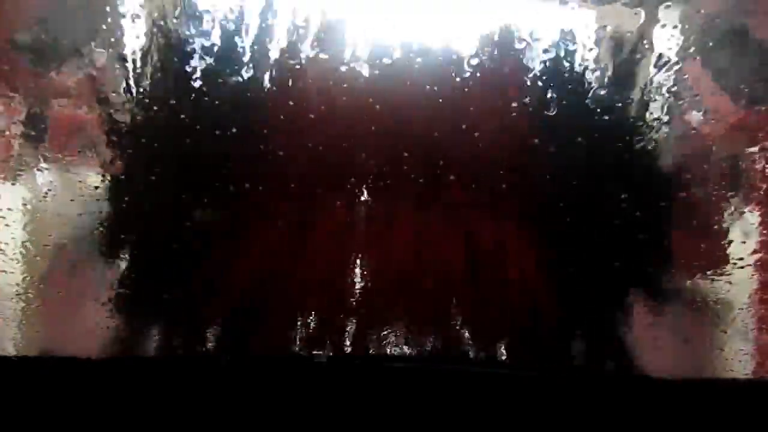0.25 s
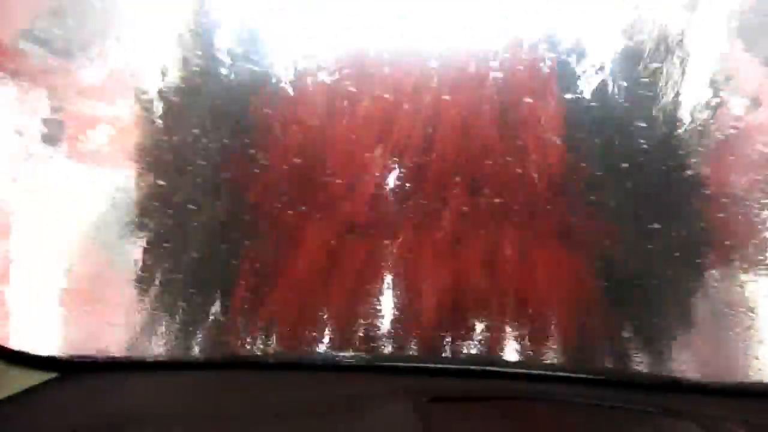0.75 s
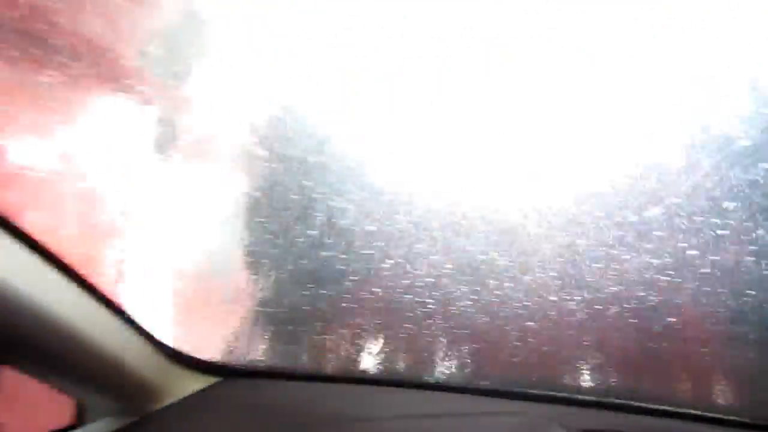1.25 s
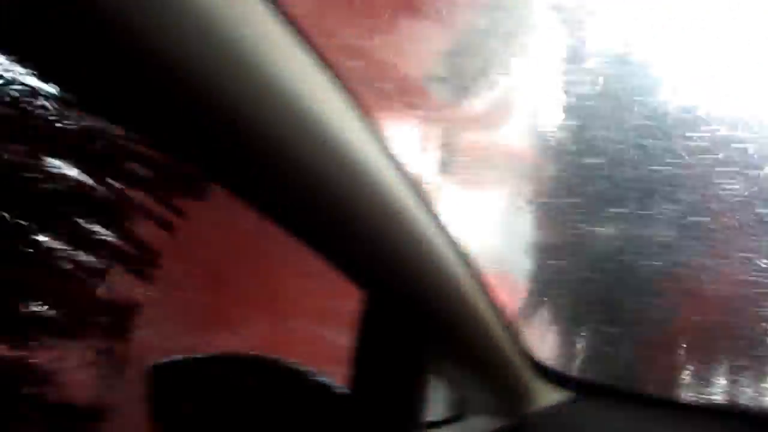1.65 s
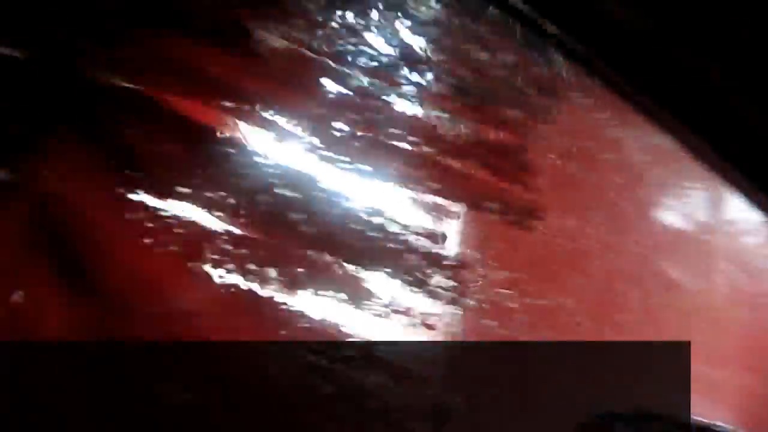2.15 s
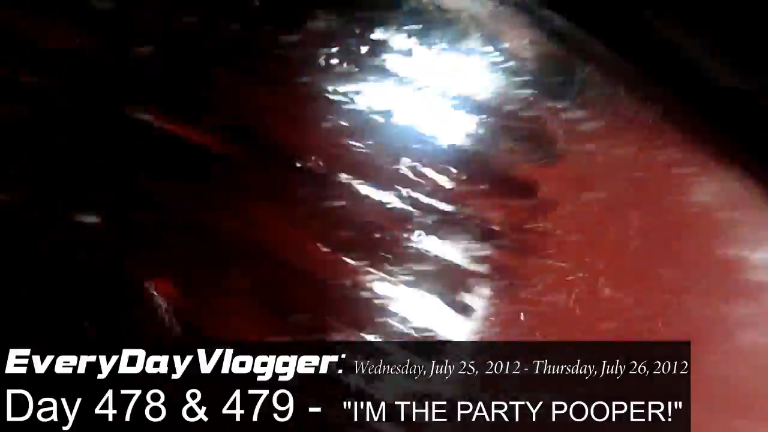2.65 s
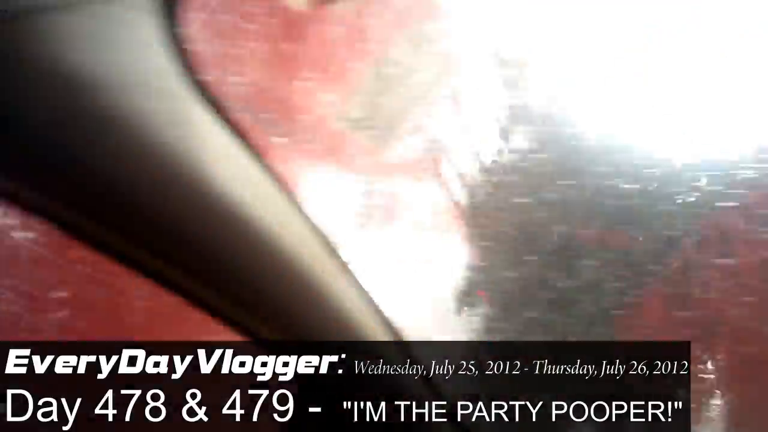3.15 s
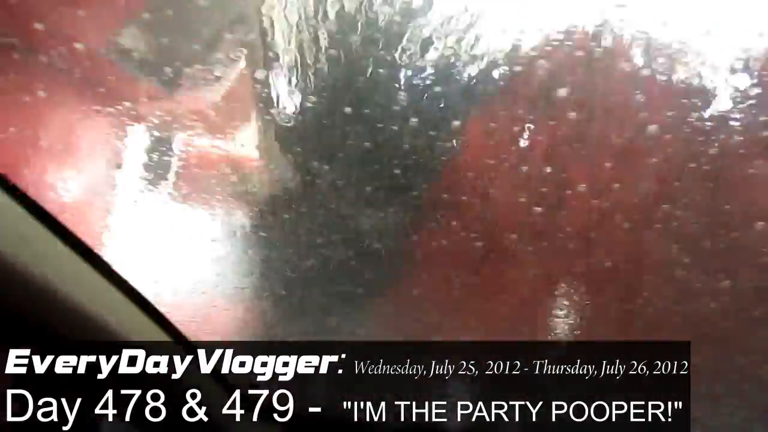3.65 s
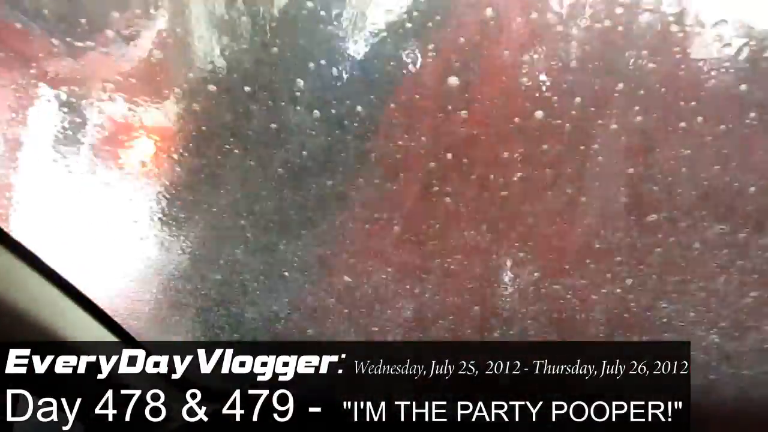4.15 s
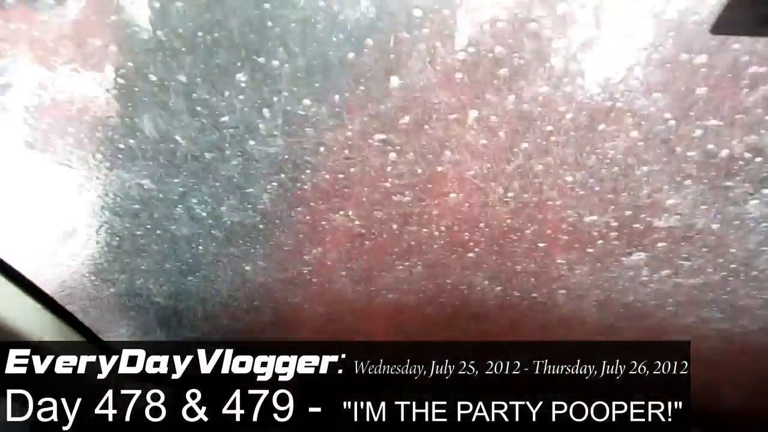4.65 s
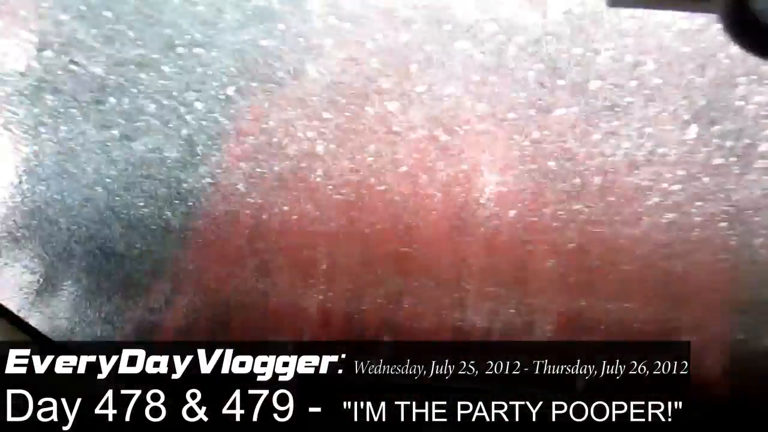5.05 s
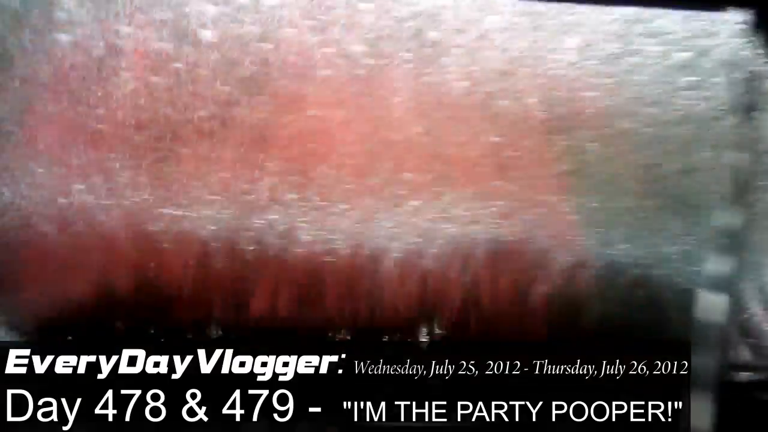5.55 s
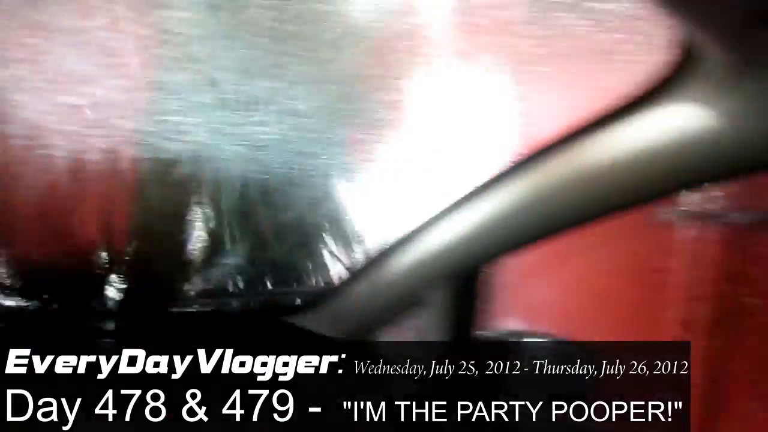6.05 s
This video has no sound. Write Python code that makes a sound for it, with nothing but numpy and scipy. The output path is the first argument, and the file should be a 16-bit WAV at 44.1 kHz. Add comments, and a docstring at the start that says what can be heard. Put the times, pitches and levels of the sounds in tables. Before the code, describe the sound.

Inside a closed car in an automatic wash, soaked cloth brushes drum and boom on the bodywork while water hisses and patters on the glass.

```python
"""The cabin booms at once as spinning cloth flogs the car: dense random blows, coloured by panel, glass and
air. Flung water hisses and patters on the glass (still denser blows, short rings); low noise rumbles below it.
Early on the body shudders (a slow sine in bouts), and doors thump (sinking tones). Slaps, flicks, drops and
bursting blobs (noise and rings with quick fades) land on the body and the glass, heard inside a closed car in
an automatic wash; towards the end the top brush nears the windscreen and the water grows brighter."""
import sys
import numpy as np
from scipy import signal
from scipy.fft import rfft, irfft, next_fast_len
from scipy.io import wavfile
from scipy.ndimage import uniform_filter1d, map_coordinates

SR = 44100
rng = np.random.default_rng(int(sys.argv[2]) if len(sys.argv) > 2 else 0)


def store_wav(level_fs):
    """Save 16-bit WAV to argv[1]."""
    pcm = np.round(np.clip(np.atleast_2d(level_fs), -1, 1) * 32767)
    wavfile.write(sys.argv[1], SR, pcm.T.astype(np.int16))


N = 278271
TIME = np.arange(N) / SR
PADDED = next_fast_len(N + SR // 2, real=True)
BINS = np.arange(PADDED // 2 + 1) * SR / PADDED   # Hz
LULL_DB = -1.5   # floor of the surges that drive the water between bunches of strips

# how near the top brush is to the windscreen: time_s, nearness (0 far - 1 touching)
NEARNESS = [(0.04, 0.15), (1.9, 0.016), (3.3, 0.078), (4.7, 0.24), (5.7, 0.31), (6.0, 0.47), (6.31, 1)]
# colour of splashing water: freq_hz, gain_db
SPLASH_COLOUR = [(900, -2.5), (1800, -2), (3000, 9), (4500, 9), (6000, 2.5), (8000, -7), (10000, -20),
                 (12000, -39.5)]
# side brushes thump a door panel: start_s, level_db, pitch_hz (at the start)
DOOR_THUMPS = [(0.248, -26, 159), (0.406, -15.5, 150), (0.736, -19, 148.6), (1, -23.5, 149),
               (1.257, -21, 154), (1.52, -22, 150.7), (1.653, -18, 150.6), (1.712, -17, 148),
               (1.819, -15, 132.4), (1.876, -18, 128), (1.933, -19, 147), (2.045, -13.5, 149),
               (2.168, -20, 157), (2.299, -13.5, 147.5), (2.369, -18.5, 135), (2.498, -17, 163),
               (2.593, -17.5, 135), (2.788, -10.5, 179.4), (2.881, -14, 144), (2.967, -14.5, 160),
               (3.048, -19, 136), (3.127, -14.5, 141.4), (3.209, -17, 133.3), (3.267, -23.5, 143),
               (3.512, -12.5, 127), (3.621, -15, 135.4), (3.741, -18.5, 136), (3.868, -18.5, 149),
               (3.932, -18, 127), (4.006, -14, 131.4), (4.075, -19.5, 143), (4.245, -17, 133.6),
               (4.346, -25.5, 141), (4.434, -11, 138.4), (4.532, -14.5, 125), (4.672, -14, 125),
               (4.809, -16, 141), (5.147, -13, 149.5), (5.208, -14.5, 141), (5.698, -20.5, 136),
               (5.826, -18, 134), (5.936, -16.5, 142.5), (6.226, -18, 157.4)]
THUMP_RISE_S = 0.016


def from_db(db):
    """Decibels to gain."""
    return 10 ** (np.asarray(db) / 20)


def rms_one(x):
    """Scale to rms 1."""
    return x / np.sqrt(np.mean(x ** 2) + 1e-20)


def in_time(rows):
    """Each column of a curve at every sample."""
    s, *columns = np.transpose(rows)
    return [np.interp(TIME, s, column) for column in columns]


def over_bins(points):
    """A (Hz, value) table at every frequency bin, interpolated over log frequency."""
    hz, value = np.transpose(points)
    return np.interp(np.log(BINS + 1), np.log(hz), value)


def drift(per_s):
    """Smooth chance of spread 1 that passes so many random knots a second."""
    knots = rng.standard_normal(2000)
    coarse = map_coordinates(knots, [TIME[::32] * per_s], order=3, mode="wrap")
    return rms_one(coarse).repeat(32)[:N]


def swells(events, rise_s, fall_s):
    """The lift in dB from events that each swell quickly to their peak and sink back."""
    out = np.zeros(N)
    for s, db in events:
        span = slice(max(int(s * SR) - SR // 6, 0), int(s * SR) + SR // 6)
        t = TIME[span] - s
        out[span] += db * np.exp(-.5 * (t / np.where(t < 0, rise_s, fall_s)) ** 2)
    return out


def burst(s, t60, rise_s):
    """The samples after a blow and its envelope there: a quick rise and an exponential fade."""
    span = slice(int(s * SR), int(s * SR) + SR // 6)
    t = TIME[:len(TIME[span])]
    return span, from_db(-60 * t / t60) * (1 - np.exp(-t / rise_s))


def colour(x, spectrum):
    """Causal (minimum-phase) filter with the given spectrum, falling 30 dB an octave beyond its ends."""
    inside = np.clip(BINS + 1, spectrum[0][0], spectrum[-1][0])
    octaves_out = np.abs(np.log2((BINS + 1) / inside))
    gain = from_db(over_bins(spectrum) - 30 * octaves_out) + 1e-6
    # folding the cepstrum onto positive times gives the minimum phase
    cepstrum = irfft(np.log(gain), PADDED)[:PADDED // 2]
    cepstrum[1:] *= 2
    response = np.exp(rfft(cepstrum, PADDED))
    return irfft(rfft(x, PADDED) * response, PADDED)[..., :N]


def resonator(hz, width_hz):
    """Coefficients of one resonance: a pole pair at its pitch, with a null at each end of the spectrum."""
    r = np.exp(-np.pi * width_hz / SR)
    return [1, 0, -1], [1, -2 * r * np.cos(2 * np.pi * hz / SR), r * r]


def evened(x, seconds=0.11):
    """Hold the short-term rms near 1."""
    size = int(seconds * SR)
    power = uniform_filter1d(uniform_filter1d(x ** 2, size), size // 2)
    return x / np.sqrt(power + 1e-12)


def impacts(per_s, spread_db):
    """Random blows, most small and a few large, each from the left or the right: rows are mid and side."""
    sizes = from_db(spread_db * np.minimum(rng.exponential(1, N), 4.5))
    signs = rng.choice([-1, 1], (2, N))
    return sizes * signs * (rng.random(N) < per_s / SR)


def beaten(spectrum, per_s, spread_db, surge_db, sway_db, steady_s=0.13):
    """A surface under a hail of blows that come in surges; its level sways by chance."""
    blows = impacts(per_s, spread_db) * from_db(surge_db)
    return evened(colour(blows, spectrum), steady_s) * from_db(sway_db * drift(16))


def pressed():
    """The loss in dB as thumps hold the door: a panel being pushed in answers lesser blows weakly."""
    peak_db = 1
    return swells([(s + THUMP_RISE_S, peak_db) for s, db, hz in DOOR_THUMPS], rise_s=0.023, fall_s=0.028)


def brushes(bunches):
    """Cloth strips flog the sheet metal and the glass, harder in each swipe; the cabin air booms and drones."""
    # side brush layers before trims: time_s, boom_db, doors_db
    side_levels = [(0.04, -32, -31), (0.35, -30, -25.5), (1.5, -28.5, -24.5), (1.8, -23, -21),
                   (2.3, -26.5, -23), (2.7, -28, -23.5), (2.95, -23.5, -21.5), (3.2, -21.5, -23.5),
                   (3.5, -26, -26.5), (4.1, -28.5, -24), (5.3, -28, -28), (5.85, -24.5, -26),
                   (6.02, -30.5, -28), (6.31, -27, -27.5)]
    # top brush layers before trims: time_s, bonnet_db, windscreen_db, pane_ring_db
    top_levels = [(0.04, -27.5, -33, -34.5), (0.33, -24, -25.5, -32.5), (1.0, -22.5, -28, -34),
                  (1.42, -21.5, -28.5, -33), (1.68, -23.5, -29, -26.5), (1.9, -24, -25.5, -30.5),
                  (2.35, -25.5, -27.5, -32), (2.95, -23.5, -25.5, -28.5), (3.2, -22, -27.5, -26.5),
                  (3.55, -23.5, -25.5, -27), (4.65, -25, -25.5, -25.5), (5.35, -21, -21, -25),
                  (5.85, -23, -23, -24), (6.31, -23.5, -29, -27)]
    # thick bunches of strips sweep over, lifts before scaling: peak_s, bonnet_lift_db, windscreen_lift_db
    swipes = [(0.065, 4.5, 3.5), (0.22, 1.5, 3), (0.268, 1, 5), (0.328, 1, -2), (0.38, 5.5, 1),
              (0.525, 2, -3), (0.705, 3.5, 1.5), (0.83, 1, 3), (1.01, 4.5, 5), (1.129, 0, 2),
              (1.267, 3, -2), (1.483, -1, 2.5), (1.546, 4, -7), (1.624, 3.5, 3), (1.73, 5, 1),
              (1.78, -2.5, -1), (1.842, 3, 3), (2.06, 4, 3.5), (2.104, 0.5, -2.5), (2.443, 4.5, 1.5),
              (2.508, 2, -1), (2.605, 1, 3), (2.859, 3, 1.5), (2.953, 2, 0), (3.045, 3, 0.5),
              (3.123, 3.5, 0), (3.322, 2, -2.5), (3.414, 1.5, -1), (3.65, 1.5, -1.5), (3.884, 1.5, -1),
              (3.972, 3, 3.5), (4.026, 2.5, 0), (4.176, 3, 1), (4.375, 2.5, 0), (4.518, 1, 6),
              (4.785, 3, 1.5), (4.905, 4.5, -4), (5.028, 0.5, 4.5), (5.27, 1.5, -3), (5.399, -1, 0.5),
              (5.491, 2, -3), (5.651, 4, -3.5), (5.759, 1, 2), (5.85, 3, 3.5), (5.931, 2.5, -3.5),
              (6.137, 3, 3), (6.195, 1, 6), (6.252, 2.5, 3.5)]
    # strips drag across the pane and set it ringing: peak_s, lift_db (re its steady ring)
    drags = [(0.266, 4.5), (0.394, 2), (0.75, 7), (0.971, 9), (1.219, 7.5), (1.525, 1), (1.702, 7),
             (2.147, 3.5), (2.577, 4), (3.199, 5.5), (3.323, 5.5), (3.529, 3), (3.651, 4.5), (3.737, 5),
             (4.021, 7.5), (4.162, 2.5), (4.365, 6), (4.685, -2.5), (4.914, 8.5), (5.193, 6), (5.432, 6.5),
             (5.77, 3.5), (6.202, 3.5)]
    # colour of the cabin boom: freq_hz, gain_db
    boom_colour = [(72, -21), (98, -11.5), (114, -2.5), (130, 0.5), (146, -9), (170, -18)]
    # colour of the cabin air at its lowest resonance: freq_hz, gain_db
    drone_colour = [(108, -28), (122, 0.5), (130, 2.5), (138, -10), (152, -24)]
    # colour of the door panels: freq_hz, gain_db
    door_colour = [(120, -27), (152, -4), (185, -6.5), (215, -8.5), (245, -6.5), (290, -16), (400, -45)]
    # colour of the bonnet: freq_hz, gain_db
    bonnet_colour = [(190, -18), (250, -3.5), (290, 0.5), (350, -1), (420, -1), (480, -2.5), (560, -5.5),
                     (680, -18), (1000, -37.5)]
    # colour of the beaten windscreen: freq_hz, gain_db
    screen_colour = [(420, -15.5), (540, 5), (640, 5), (760, 7), (860, 2.5), (1000, -15), (1500, -26)]
    # colour of the ringing pane: freq_hz, gain_db
    ring_colour = [(700, -17), (870, -1), (945, -1), (1020, -0.5), (1130, -2), (1220, -6.5), (1380, -16),
                   (2000, -38)]

    boom_db, door_db = in_time(side_levels)
    bonnet_db, screen_db, ring_db = in_time(top_levels)
    bonnet_swipe_db = swells([(s, db) for s, db, _ in swipes], rise_s=0.016, fall_s=0.016)
    screen_swipe_db = swells([(s, db) for s, _, db in swipes], rise_s=0.016, fall_s=0.016)
    drag_db = swells(drags, rise_s=0.014, fall_s=0.012)
    damped_db = pressed()

    boom = beaten(boom_colour, per_s=500, spread_db=3.0, surge_db=0.43 * bunches, sway_db=1.0, steady_s=0.055)
    drone = beaten(drone_colour, per_s=900, spread_db=1.5, surge_db=-2, sway_db=-1.2, steady_s=0.03)
    doors = beaten(door_colour, per_s=700, spread_db=3.5, surge_db=bunches, sway_db=1.35, steady_s=0.092)
    bonnet = beaten(bonnet_colour, per_s=1300, spread_db=1.0, surge_db=0.6 * bunches, sway_db=0.5, steady_s=0.06)
    screen = beaten(screen_colour, per_s=1200, spread_db=1.0, surge_db=1.6 * bunches, sway_db=0.5, steady_s=0.06)
    ring = beaten(ring_colour, per_s=2000, spread_db=1.5, surge_db=0.58 * bunches, sway_db=0.64)

    out = from_db(boom_db - damped_db + 1.64) * boom
    out += from_db(boom_db - damped_db - 5.5) * drone
    out += from_db(door_db - 0.5 * damped_db - 0.15) * doors
    out += from_db(bonnet_db + 1.17 * bonnet_swipe_db - 0.26) * bonnet
    out += from_db(screen_db + 1.14 * screen_swipe_db - 2.0) * screen
    out += from_db(ring_db + drag_db - 4.0) * ring
    return out


def cabin(x):
    """The panes and the cabin air ring on at their resonances, which lifts narrow bands of what they are fed."""
    # resonances of panes and cabin air: freq_hz, width_hz, lift_db (each alone, before the overall trim)
    modes = [(187, 16, 1.5), (337.4, 24, 2.5), (402, 18, 2.5), (495.5, 17, 4), (577, 13, 3), (630, 36, 4),
             (707, 19, 3), (928, 32, 2.5), (998, 40, 5.5), (1066, 21, 5), (1194, 51, 3.5), (1324, 64, 5),
             (1580, 45, 8.5)]
    for hz, width_hz, db in modes:
        r = np.exp(-np.pi * width_hz / SR)
        unit_peak = (1 - r * r) / 2
        x = x + (from_db(db) - 1) * unit_peak * signal.lfilter(*resonator(hz, width_hz), x)
    return from_db(-1) * x


def rumble():
    """The body shakes on its springs in a few bouts, a wandering low sine; gantry noise rumbles throughout."""
    # bouts of shaking: start_s, length_s (before the release), level_db
    shudders = [(0.128, 0.14, -30.5), (0.38, 0.048, -24.5), (0.537, 0.09, -23), (0.7, 0.31, -25.5),
                (1.2, 0.12, -23), (1.423, 0.16, -31)]
    # gantry rumble before its trim: time_s, level_db
    gantry_level = [(0.04, -32), (0.7, -38), (1.3, -31), (2.4, -35), (2.8, -31), (3.35, -36.5),
                    (3.95, -28.5), (4.65, -33.5), (5.83, -29.5), (6.0, -37), (6.31, -33.5)]
    # colour of the gantry: freq_hz, gain_db
    gantry_colour = [(18, -29.5), (27, -6.5), (36, -3), (46, 0), (62, -0.5), (82, -3), (105, -2.5)]
    attack_s, release_s = 0.07, 0.16
    shake_hz, wander_hz = 34, 0.8

    bouts = np.zeros(N)
    for s, length_s, db in shudders:
        attack = np.clip((TIME - s) / attack_s, 0, 1)
        release = np.clip(1 - (TIME - s - length_s) / release_s, 0, 1)
        bouts += from_db(db) * attack * release
    cycles = np.cumsum(shake_hz + wander_hz * drift(9.9)) / SR
    shaking = np.sqrt(2) * np.sin(2 * np.pi * cycles) * [[1], [0]]   # mid only
    gantry_db, = in_time(gantry_level)
    noise = colour(rng.standard_normal((2, N)), gantry_colour)
    return bouts * shaking + from_db(gantry_db + 0.5) * evened(noise, seconds=0.1)


def through_glass(x):
    """The pane lets little of the top treble in."""
    return signal.sosfilt(signal.butter(8, 7200, fs=SR, output="sos"), x)


def patter(low_hz, high_hz, per_s, width_hz, tilt_db, spread_db=2.5):
    """Drops ring briefly at one of twelve pitches, with a level tilt by the octave; per_s is for each pitch."""
    out = 0
    for hz in np.geomspace(low_hz, high_hz, 12):
        drops = impacts(per_s, spread_db) + 1e-18   # tiny offset keeps the filter clear of denormals
        level = from_db(tilt_db * np.log2(hz / low_hz))
        out = out + level * signal.lfilter(*resonator(hz, width_hz), drops)
    return rms_one(through_glass(out))


def water(bunches):
    """Bunches of strips throw a sheet of water, drops and mist; stray heavy drops click through the hiss."""
    # water flung at the glass, before each layer's share: time_s, flow_db (re usual)
    flow = [(0.04, 0.5), (0.11, -10.5), (0.25, -1), (0.33, -4), (0.62, 2), (0.9, 1), (1.15, -2),
            (1.65, 1.5), (2.1, -4), (2.7, -2), (3.22, 0.5), (3.9, 1.5), (4.7, 1), (5.6, 5), (6.31, -0.5)]
    # how roughly the water lands, in gouts while only the strip tips touch: time_s, coarseness (1 usual)
    coarseness = [(1.2, 1.4), (2.0, 0.93), (5.3, 0.83), (5.9, 1.26)]
    # gouts hit the glass and run off: peak_s, lift_db (on the wash; scaled for drops and mist)
    gouts = [(0.068, -1), (0.268, 2), (0.514, 2.5), (0.613, 4), (0.7, 3), (0.79, 0), (1.096, 2.5),
             (1.219, 4.5), (1.659, 2.5), (2.305, 0.5), (2.5, 0.5), (2.768, 2.5), (3.269, 1.5), (3.408, -1),
             (3.911, 2.5), (4.304, 3), (4.515, -1), (4.745, 1), (5.288, 4), (5.568, 0.5), (5.77, 2.5),
             (6.054, 4.5), (6.194, 7)]
    # colour of the sheet of water: freq_hz, gain_db
    wash_colour = [(900, -16.5), (1350, 3), (1600, 3), (2000, -1), (2500, -5), (3200, -14), (4500, -35),
                   (8000, -43.5)]
    # colour of the drops: freq_hz, gain_db
    drops_colour = [(1900, -14.5), (3000, 0.5), (3800, -0.5), (4700, -6.5), (5500, -10), (7000, -23.5),
                    (9000, -38)]
    # colour of the mist: freq_hz, gain_db
    mist_colour = [(3500, -15.5), (5500, -1.5), (6500, -3.5), (7500, -6.5), (8500, -11), (10000, -19.5),
                   (11500, -43), (15000, -36.5)]

    flow_db, = in_time(flow)
    near, = in_time(NEARNESS)
    coarse, = in_time(coarseness)
    gout_db = swells(gouts, rise_s=0.013, fall_s=0.0096)
    # base level, share of the flow's swing, gain as the brush arrives, share of the gouts
    wash_db = -38 + 0.61 * flow_db + 1.1 * near + gout_db
    drops_db = -52 + flow_db + 2.5 * near + 1.5 * gout_db
    mist_db = -63.5 + 0.52 * flow_db + 13 * near + 0.25 * gout_db

    wash_surge_db = np.maximum(2.7 * coarse * bunches, LULL_DB)
    wash = beaten(wash_colour, per_s=3000, spread_db=0.0, surge_db=wash_surge_db, sway_db=0.25 * coarse)
    plops = patter(low_hz=1389, high_hz=2763, per_s=16, width_hz=60, tilt_db=-8.5)
    wash += from_db(-8.5) * coarse * plops

    gusts = coarse * (2.3 * bunches + 1.2 * drift(110))
    drops_surge_db = np.maximum(gusts, LULL_DB)
    drops = beaten(drops_colour, per_s=6000, spread_db=0.0, surge_db=drops_surge_db, sway_db=1.4 * coarse)
    ringing_drops = patter(low_hz=2370, high_hz=6640, per_s=23, width_hz=300, tilt_db=-12.0)
    drops += from_db(-10) * coarse * ringing_drops

    mist_surge_db = np.maximum(2.0 * gusts + 1.1 * coarse * drift(140), LULL_DB)
    mist = beaten(mist_colour, per_s=14000, spread_db=0.5, surge_db=mist_surge_db, sway_db=0.3 * coarse)
    heavy_drops = rms_one(colour(impacts(per_s=200, spread_db=2.5), SPLASH_COLOUR))
    mist += coarse * from_db(6.1 * near - 6.0) * heavy_drops
    return from_db(wash_db) * wash + from_db(drops_db) * drops + from_db(mist_db) * mist


def spray():
    """Fine spray on the windscreen: an even hail of tiny blows whose level changes slowly."""
    # spray on the windscreen: time_s, level_db
    spray_level = [(0.04, -71.5), (2.7, -65), (3.25, -55), (4.2, -53.5), (5.2, -60.5), (5.8, -53),
                   (6.31, -49.5)]
    # colour of the spray: freq_hz, gain_db
    spray_colour = [(2400, -13), (3500, 4), (4700, 0), (5600, -3.5), (7000, -12.5), (9000, -27)]
    spray_db, = in_time(spray_level)
    return from_db(spray_db) * rms_one(colour(impacts(per_s=9800, spread_db=1.0), spray_colour))


def spatter():
    """Single drops from the top brush ping on the windscreen, louder the nearer it is."""
    near, = in_time(NEARNESS)
    touching_db, far_loss_db = -46.5, 24
    pings = patter(low_hz=4200, high_hz=7200, per_s=14, width_hz=900, tilt_db=-4.5, spread_db=4.0)
    return from_db(touching_db - far_loss_db * (1 - near)) * pings


def splats(rise_s=0.0056, width_hz=900, grains_per_s=2500):
    """A soft blob bursts on the glass and runs out as a fading crowd of droplets around one pitch."""
    # blobs of water: start_s, level_db, centre_hz, t60_s
    blobs = [(0.165, -45, 3570, 0.087), (0.262, -44, 3500, 0.1), (0.373, -43, 3300, 0.12),
             (0.44, -47, 3100, 0.067), (0.558, -34, 2800, 0.07), (0.587, -34, 2600, 0.14),
             (0.618, -40, 3400, 0.085), (0.645, -30, 2880, 0.067), (0.686, -37, 2300, 0.1),
             (0.736, -39, 3280, 0.1), (0.96, -33, 2550, 0.12), (1.628, -38, 3400, 0.1),
             (1.698, -39, 3200, 0.061), (3.174, -35, 3480, 0.17), (3.44, -39, 3000, 0.08),
             (3.725, -36.5, 2880, 0.12), (3.821, -41, 3800, 0.065), (4.863, -39.5, 3480, 0.091),
             (5.016, -38, 3880, 0.06), (5.555, -40, 3580, 0.066), (5.825, -31, 3980, 0.07),
             (5.893, -39, 5000, 0.1), (5.993, -34, 4160, 0.07), (6.05, -28, 1800, 0.042),
             (6.092, -36, 3900, 0.082), (6.185, -32, 1700, 0.091), (6.188, -35, 3960, 0.1),
             (6.277, -39, 5600, 0.089)]
    out = np.zeros((2, N))
    grains = impacts(grains_per_s, spread_db=2.5)
    for s, db, hz, t60 in blobs:
        span, fade = burst(s, t60, rise_s)
        zeros, poles = resonator(hz, width_hz)
        ring = [*zeros, *poles]
        out[:, span] += from_db(db) * fade * rms_one(signal.sosfilt([ring, ring], grains[:, span]))
    return out


def ticks(level_db=4, t60=0.0058, scatter_db=-11, scatter_t60=0.022, width_hz=1700, click_db=-5, click_t60=0.003):
    """A big drop, or once the knock of a heavy slap, clicks and rings for a few milliseconds; scattered echoes
    follow in the same colour."""
    # big drops on the glass, plus at 6.052 s the sharp knock of the heavy slap: start_s, level_db (before the
    # ring and click trims), ring_hz
    big_drops = [(0.1675, -41, 4200), (0.5165, -32, 5230), (0.6553, -36, 3700), (0.6945, -40, 3600),
                 (0.701, -36, 3280), (0.7651, -33, 3450), (0.811, -32, 3900), (0.9177, -25, 6800),
                 (1.0485, -37, 4500), (1.2297, -35, 4310), (1.254, -41, 4700), (1.2753, -36, 5000),
                 (1.329, -31.5, 3900), (1.3854, -44, 6000), (1.402, -41, 5400), (2.518, -42, 4500),
                 (2.8106, -38, 4600), (2.9056, -43, 4300), (3.0312, -38, 5600), (3.18, -31, 3500),
                 (3.186, -40, 3580), (3.232, -32, 4500), (3.248, -38, 4300), (3.287, -30, 4400),
                 (3.3083, -34, 4700), (3.345, -28.5, 4770), (3.4134, -31, 4200), (3.509, -33, 4400),
                 (3.699, -27.5, 5100), (3.9033, -37, 4200), (4.9893, -31.5, 5570), (5.2244, -37, 5000),
                 (5.2773, -28, 4800), (5.3945, -33, 6260), (5.625, -39, 6200), (5.658, -32, 5510),
                 (5.688, -21.5, 5400), (5.7498, -39, 4800), (5.829, -31, 5600), (5.848, -30, 5840),
                 (5.892, -31, 5170), (5.897, -35, 5700), (5.9036, -34, 5500), (5.9565, -37, 5200),
                 (5.969, -32, 5800), (6.017, -30, 5680), (6.0295, -32, 6800), (6.045, -21, 5200),
                 (6.052, -9, 1640), (6.054, -22, 5280), (6.096, -32, 5830), (6.139, -35, 6300),
                 (6.152, -22, 5830), (6.1833, -25, 6470), (6.194, -19, 5510), (6.2015, -29, 5900),
                 (6.222, -28, 1900), (6.225, -30, 5600), (6.24, -22.5, 2000), (6.268, -19.5, 5800),
                 (6.281, -27, 5700), (6.305, -25, 5430)]
    out = np.zeros((2, N))
    clicks = np.zeros(N)
    for s, db, hz in big_drops:
        span, fade = burst(s, t60, rise_s=0.00049)
        phase = 2 * np.pi * hz * TIME[:len(fade)] + [[0], [np.pi / 2]]
        ring = fade * np.sin(phase) * [[1], [.45]]   # the side is weaker, a quarter cycle ahead
        echoes = signal.lfilter(*resonator(hz, width_hz), rng.standard_normal(ring.shape))
        span, tail = burst(s, scatter_t60, rise_s=0.0033)
        out[:, span] += from_db(db + level_db) * (ring + from_db(scatter_db) * tail * rms_one(echoes))
        clicks[span] += from_db(db + click_db) * burst(s, click_t60, rise_s=0.0001)[1]
    return through_glass(out) + colour(clicks * rng.standard_normal((2, N)), SPLASH_COLOUR)


def thumps(sag=0.017, t60=0.17):
    """A door panel is pushed in softly and booms briefly, its pitch sagging a little."""
    out = np.zeros(N)
    for s, db, hz in DOOR_THUMPS:
        span = slice(int(s * SR), int(s * SR) + SR // 4)
        t = TIME[:len(TIME[span])]
        swell = np.sin(np.pi / 2 * np.minimum(t / THUMP_RISE_S, 1)) ** 2
        fade = from_db(-60 * np.maximum(t - THUMP_RISE_S, 0) / t60)
        cycles = hz * t * (1 - sag * t / t60) + rng.random()
        out[span] += from_db(db) * swell * fade * np.sin(2 * np.pi * cycles)
    return out * [[1], [0]]   # mid only


def slaps(level_db=-13, t60=0.02):
    """A clump of soaked strips lands on the body at once: a short burst of cloth-coloured noise."""
    # heavy slaps: start_s, slap_db (before level_db is added)
    heavy_slaps = [(0.467, -7), (1.082, 0), (2.305, 5), (2.417, 1), (2.855, -5), (5.862, 4.5), (6.051, 8)]
    # colour of wet cloth: freq_hz, gain_db
    cloth_colour = [(150, -0.5), (300, 5.5), (650, 13.5), (1050, -2), (1400, -10.5), (2500, -24),
                    (5000, -36.5)]
    force = np.zeros(N)
    for s, db in heavy_slaps:
        span, fade = burst(s, t60, rise_s=0.0023)
        force[span] += from_db(db + level_db) * fade
    cloth = rng.standard_normal((2, N))
    return colour(cloth * force, cloth_colour) / np.std(colour(cloth[0], cloth_colour))


def flicks(splash_db=-6, edge_db=-3, splash_t60=0.045, crack=0.88, crack_t60=0.0082):
    """A wet strip swipes the glass: a sharp crack and a burst of droplets that dies quickly, edged with treble."""
    # strips on the glass, before trims: start_s, level_db, edge_db (re level_db)
    strips = [(0.5138, -23.5, -4), (0.5606, -34, -15), (0.6483, -38, -1), (0.666, -43, 0), (0.716, -38, 3),
              (0.7901, -33, -18), (0.9142, -28, -7), (0.92, -41, -6), (1.0046, -32, -5), (1.2156, -35, -23),
              (1.274, -39, -23), (1.402, -36, -10), (3.7725, -28, -25), (5.0037, -30, -24),
              (5.282, -34, -22), (5.774, -25, -13), (5.8134, -25, -11), (5.847, -30, -12),
              (5.8915, -30, -26), (5.969, -31, -11), (5.9953, -26, -22), (6.0432, -28, -17),
              (6.053, -36, -19), (6.115, -28, -22), (6.1504, -26, -12), (6.184, -21.5, -6),
              (6.2248, -31.5, -17), (6.266, -22, -16), (6.3024, -21, -12)]
    # colour of the bright edge: freq_hz, gain_db
    edge_colour = [(3000, -31), (6000, 1.5), (7800, 3.5), (9500, -8), (11000, -22), (12500, -34)]
    splash, edge = np.zeros((2, N))
    for s, db, bright_db in strips:
        span, fade = burst(s, splash_t60, rise_s=0.0011)
        fade = 0.74 * fade + crack * burst(s, crack_t60, rise_s=0.00029)[1]
        splash[span] += from_db(db + splash_db) * fade
        edge[span] += from_db(db + bright_db + edge_db) * fade
    droplets = colour(splash * rms_one(impacts(per_s=6700, spread_db=5.5)), SPLASH_COLOUR)
    return droplets + colour(edge * rms_one(impacts(per_s=10000, spread_db=7.0)), edge_colour)


def microphones(x):
    """The two sides are alike in the bass and differ in the treble; the right one is louder."""
    # stereo width, filtering the side signal: freq_hz, gain_db
    width = [(20, -22), (130, -24), (290, -21), (640, -17), (1400, -11.5), (3100, -8.5), (6800, -5),
             (16000, -3)]
    # balance between the microphones: freq_hz, left_minus_right_db
    lean = [(20, -5.5), (110, -4.4), (380, -3.9), (1300, -3), (2400, -2), (8000, -1.2), (16000, 0)]
    mid, side = x[0], colour(x[1], width)
    left = colour(mid + side, [(hz, db / 2) for hz, db in lean])
    right = colour(mid - side, [(hz, -db / 2) for hz, db in lean])
    return np.array([left, right])


def scene():
    """Brushes, water and rumble, heard from the front seat."""
    bunches = 0.37 * drift(22) + 0.41 * drift(70)   # the strips land in uneven bunches
    body = cabin(brushes(bunches) + slaps()) + rumble() + thumps()
    glass = water(bunches) + spray() + spatter() + splats() + ticks() + flicks()
    return microphones(body + glass)


def record(dry):
    """The sound sets in after a moment of silence and ends in a quick fade; the top is cut."""
    start_s, fade_s, stopband_hz = 0.039, 0.002, 15700
    corners_s = [start_s, start_s + fade_s, TIME[-1] - fade_s, TIME[-1]]
    running = np.interp(TIME, corners_s, [0, 1, 1, 0])
    return signal.sosfilt(signal.cheby2(12, 70, stopband_hz, fs=SR, output="sos"), dry * running)


dry = scene()
out = record(dry)
store_wav(out)
```